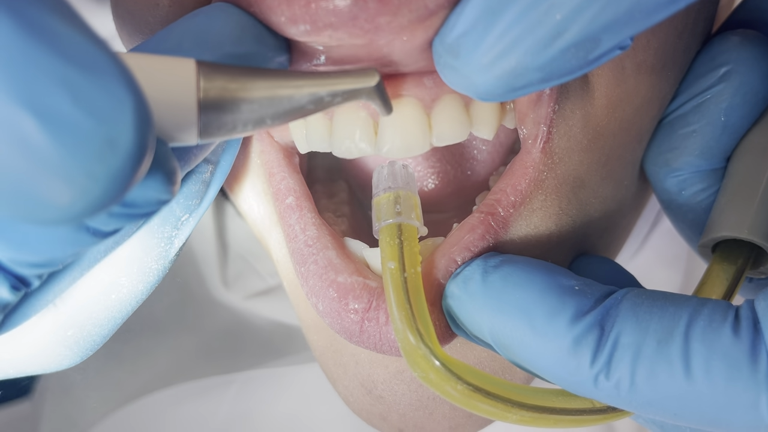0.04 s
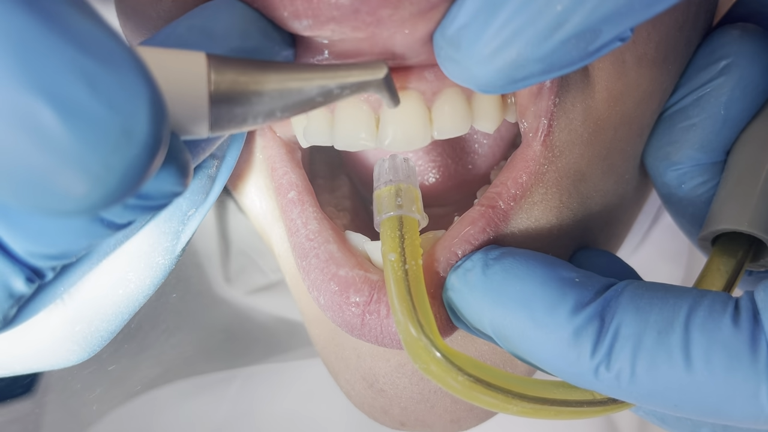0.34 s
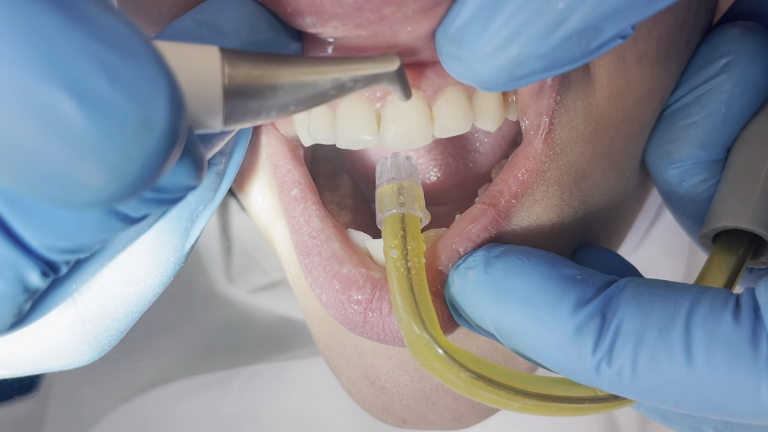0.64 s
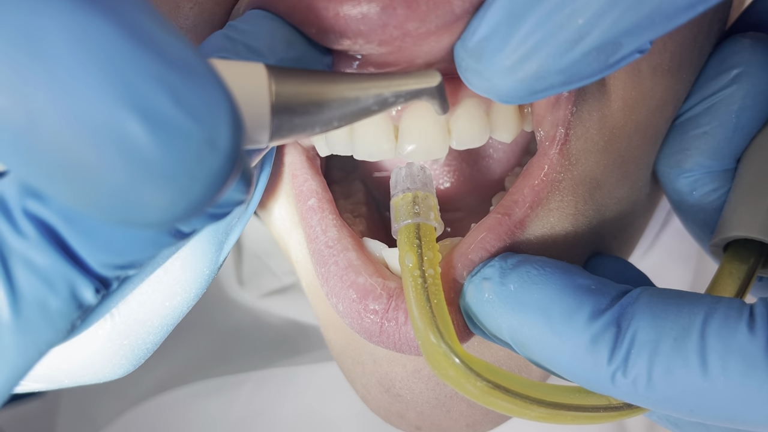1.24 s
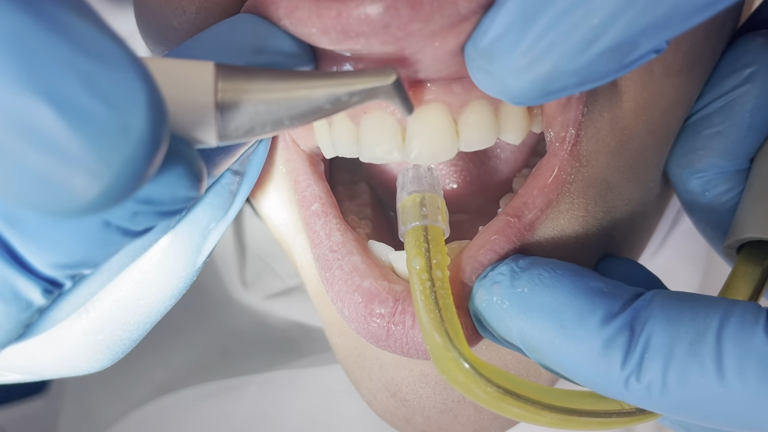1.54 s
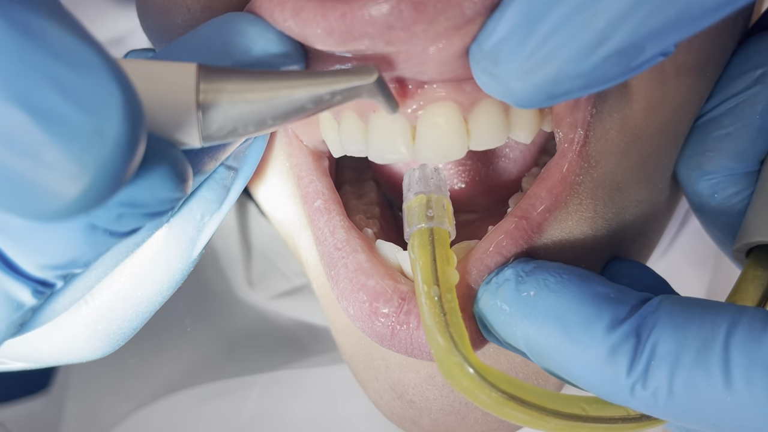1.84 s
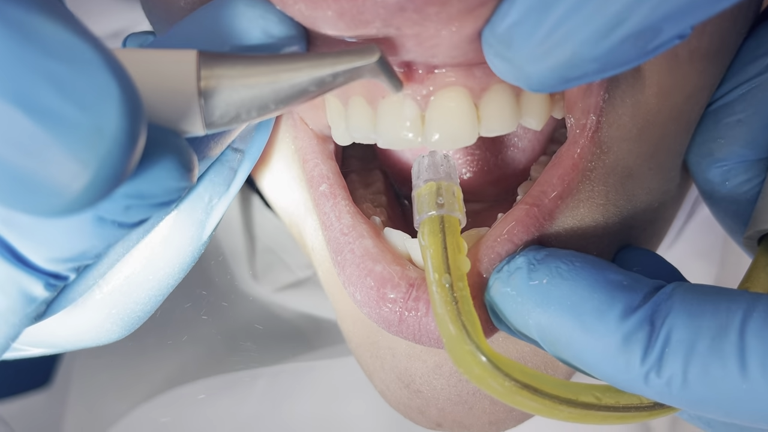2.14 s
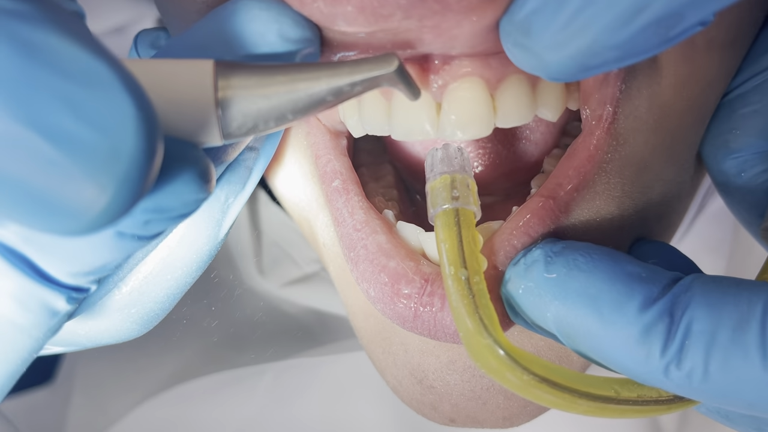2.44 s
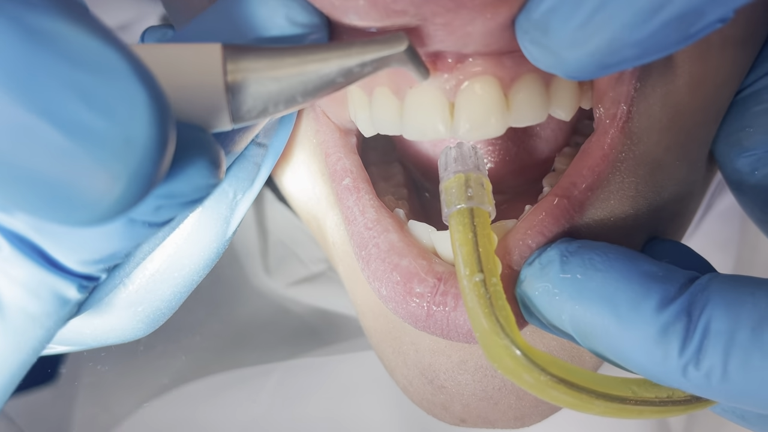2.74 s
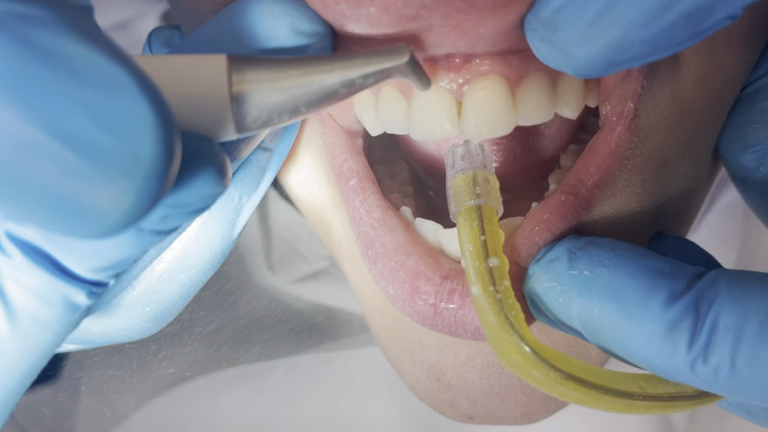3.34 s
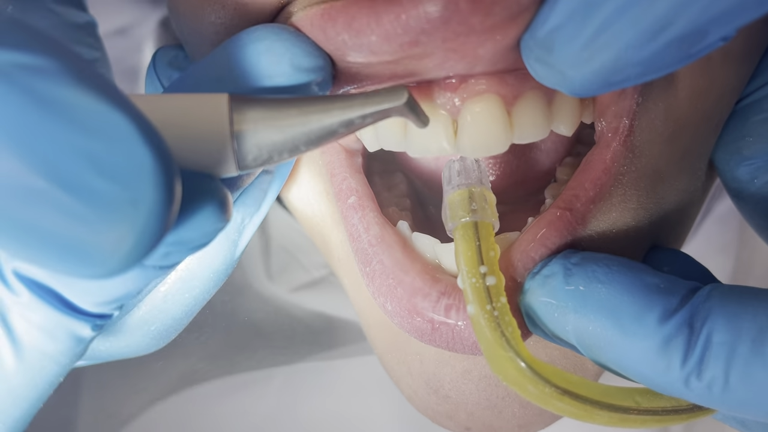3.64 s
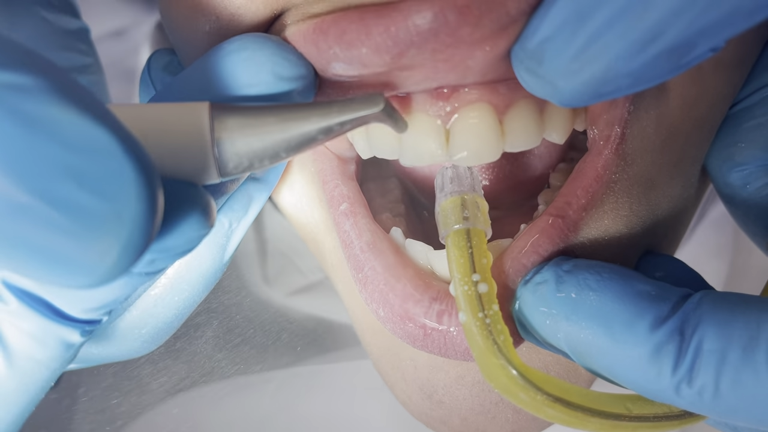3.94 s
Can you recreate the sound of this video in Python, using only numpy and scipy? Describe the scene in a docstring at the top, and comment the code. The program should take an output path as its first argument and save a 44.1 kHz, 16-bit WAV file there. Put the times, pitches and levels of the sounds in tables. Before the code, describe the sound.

Bright spray hiss from a dental polisher, pausing briefly, with gurgling suction and low pump hum.

```python
"""A small dental treatment room, a pair of microphones close to the open mouth.
An air polisher sprays the front teeth: the jet hisses, flares where it strikes enamel and rings
the mouth. It gives two wet squeals and dies down for half a second. A suction tube slurps
throughout and pops on slugs of water, most of all in the lull, over the low drone of its pump."""
import sys
import numpy as np
from scipy import signal
from scipy.fft import rfft, irfft
from scipy.io import wavfile

SR = 44100
rng = np.random.default_rng(int(sys.argv[2]) if len(sys.argv) > 2 else 0)


def put_to_file(sound):
    """Save the sound as 16-bit audio at rate SR, in the file named by the first command-line argument."""
    columns = np.atleast_2d(sound).T  # one column per channel
    safe = np.clip(columns, -1, 1)
    whole_steps = np.round(safe * 32767)
    wavfile.write(sys.argv[1], SR, whole_steps.astype(np.int16))


N = 176400


def amp(db):
    return 10 ** (np.asarray(db) / 20)


def unit_rms(x):
    return x / np.sqrt(np.mean(x ** 2) + 1e-20)


def curve(points):
    """Joins (time, value) points, sample by sample."""
    return np.interp(np.arange(N) / SR, *np.transpose(points))


def spectrum(points):
    """Joins (frequency, value) points, bin by bin, on a log frequency axis."""
    hz, value = np.transpose(points)
    return np.interp(np.log(np.fft.rfftfreq(N, 1 / SR) + 1), np.log(hz + 1), value)


def colour(x, points):
    """Filters x by (frequency, dB) points, to an rms of 1."""
    return unit_rms(irfft(rfft(x) * amp(spectrum(points)), N))


def add(mix, start_s, sound):
    part = mix[round(start_s * SR):][:len(sound)]
    part += sound[:len(part)]


def wander(hz):
    """Random drift, mostly slower than hz, at an rms of 1."""
    f = np.fft.rfftfreq(N, 1 / SR)
    return unit_rms(irfft(rfft(rng.standard_normal(N)) * (f > hz / 10) / (1 + (f / hz) ** 2), N))


def resonate(x, hz, width):
    """A steep resonance of gain 1 that follows hz."""
    carrier = np.exp(2j * np.pi * np.cumsum(hz * np.ones(len(x))) / SR)
    r = np.exp(-np.pi * width / SR)
    return 2 * (carrier * signal.lfilter([(1 - r) ** 2], [1, -2 * r, r * r], x * carrier.conj())).real


def wet_noise(clicks_per_s, spread_db, click_share):
    """Turbulence mixed with droplet clicks of uneven size."""
    clicks = (rng.random(N) < clicks_per_s / SR) * rng.choice([-1, 1], N)
    sizes = amp(spread_db * np.minimum(rng.exponential(1, N), 4))
    turbulence = rng.standard_normal(N)
    return np.sqrt(1 - click_share) * turbulence + np.sqrt(click_share) * unit_rms(clicks * sizes)


def air_jet():
    """Turbulent air hisses out of the nozzle."""
    # air flow through the nozzle (time [s], level [dB])
    flow = [(0, -31.5), (.8, -31.5), (1.25, -33), (1.68, -32.5), (1.82, -32.5), (1.95, -49), (2.25, -44),
            (2.4, -38), (2.53, -34.5), (2.9, -30.5), (3.4, -33), (4, -31.5)]
    # hiss of the free jet (frequency [Hz], relative level [dB])
    hiss = [(30, -39), (500, -25), (1200, -11.5), (2100, -8), (2600, -14.5), (3200, -10), (3700, -18),
            (4300, -5), (5600, -8.5), (8000, -8), (10500, 6), (13000, -21.5), (14200, -4), (15000, -8),
            (16000, -1)]
    return amp(curve(flow)) * colour(rng.standard_normal(N), hiss)


def enamel(spray, position):
    """Spray strikes enamel with a bright hiss that changes colour from tooth to tooth."""
    # spray striking the teeth (time [s], relative level [dB])
    impact = [(0, -22.5), (.03, -23), (.1, -26), (.25, -27.5), (.4, -31), (.46, -22.5), (.54, -23),
              (.58, -28), (.75, -26), (.8, -30), (.965, -31.5), (.995, -25), (1.04, -21.5), (1.12, -20),
              (1.16, -24.5), (1.42, -27.5), (1.68, -31.5), (1.83, -40), (1.94, -47), (2.22, -53.5),
              (2.37, -43), (2.53, -27), (2.63, -23), (2.7, -26), (2.94, -25), (3.03, -22), (3.15, -21),
              (3.23, -26.5), (3.42, -28.5), (3.53, -22.5), (3.67, -22), (3.72, -28), (4, -28)]
    # points along the spectrum of that hiss (frequency [Hz])
    hiss_hz = [2000, 5000, 7000, 8000, 8600, 9100, 9400, 9900, 10500, 11250, 11700, 12100, 12600, 13200,
               14200, 15500]
    # hiss on the first teeth at those points (relative level [dB])
    first_db = [-36, -43, -16, -14.5, -13.5, -6.5, -12, -0.5, -3.5, 0, -8, -3, -23, -12, -20, -19]
    # hiss on the next teeth at those points (relative level [dB])
    next_db = [-43, -31, -22.5, -12.5, -5.5, -7.5, -5.5, -5.5, -1.5, 1, 0.5, -11.5, -6, -18.5, -19, -38]
    on_first, on_next = (colour(spray, list(zip(hiss_hz, db))) for db in (first_db, next_db))
    return amp(3 + curve(impact)) * ((1 - position) * on_first + position * on_next)


def mouth(spray, position):
    """Spray rings the mouth, whose resonances rise a little as the nozzle moves on."""
    # resonances of the open mouth (frequency [Hz], width [Hz], gain at first teeth [dB], at next [dB])
    resonances = [(3200, 380, -18, -18.5), (4224, 454, -4, -8), (5310, 390, -2.5, 0.5), (6213, 520, 2, 2.5),
                  (7384, 660, 2, 3.5), (9030, 1500, -10.5, -7)]
    # spray ringing the mouth (time [s], relative level [dB])
    ringing = [(0, -32), (.04, -30.5), (.16, -39.5), (.37, -40), (.46, -30), (.62, -30), (.72, -38.5),
               (.93, -39.5), (1.02, -29), (1.1, -27), (1.2, -34.5), (1.6, -35), (1.68, -30.5), (1.78, -37),
               (1.93, -56), (2.3, -52.5), (2.39, -43), (2.415, -36), (2.6, -27), (2.66, -28), (2.74, -38),
               (2.9, -36), (3.02, -31), (3.17, -32.5), (3.37, -42), (3.52, -32.5), (3.68, -32.5),
               (3.8, -38.5), (4, -41.5)]
    pitch = 1 + 0.023 * position
    ring = sum(amp(first_db + (next_db - first_db) * position) * resonate(spray, hz * pitch, width)
               for hz, width, first_db, next_db in resonances)
    return amp(0.5 + curve(ringing)) * unit_rms(ring)


def polisher():
    """Free jet, spray on enamel and ringing mouth, all sputtering together."""
    # the nozzle's travel from the first teeth to the next (time [s], position [0-1])
    travel = [(0, 0), (1.1, 0.14), (1.9, 0.7), (2.55, 1), (3.1, 0.66), (3.6, 1), (4, 0.7)]
    position = np.clip(curve(travel), 0, 1)
    air = air_jet()
    on_teeth, in_mouth = (wet_noise(clicks_per_s=2500, spread_db=1.5, click_share=0.26) for _ in range(2))
    sputter = np.exp(0.081 * wander(hz=84.5))
    return (air + enamel(on_teeth, position) + mouth(in_mouth, position)) * sputter


def suction():
    """Air and small bubbles rush through the tube's resonance."""
    # strength of the slurping (time [s], level [dB])
    slurp = [(0, -45), (.45, -43.5), (.97, -45.5), (1.01, -39), (1.07, -37.5), (1.14, -48), (1.42, -43.5),
             (1.8, -47.5), (1.95, -47.5), (2.28, -48), (2.45, -45.5), (2.53, -44.5), (2.7, -45), (3.3, -46),
             (4, -48)]
    # response of the suction tube (frequency [Hz], relative level [dB])
    tube = [(30, -43), (150, -10), (300, -11), (450, -9), (700, -15.5), (1000, -8), (1200, -2), (1380, 7.5),
            (1520, 0.5), (1750, -11.5), (2100, -35.5), (2700, -14), (3250, -8), (3600, -8), (6300, -16),
            (7000, -24), (9000, -12), (13000, -36), (16000, -36)]
    bubbly_air = wet_noise(clicks_per_s=260, spread_db=2.5, click_share=0.54)
    return amp(curve(slurp)) * colour(bubbly_air, tube)


def pump():
    """The suction pump rumbles and hums, its bass nearly alike on both microphones."""
    # pump tones and a thin suction whistle (frequency [Hz], level [dB], waver [share of the pitch])
    partials = [(132.7, -54.5, 0.018), (193.5, -60.5, 0.0094), (325.5, -68, 0.01), (6460, -59.5, 0.0019)]
    # pump drone (frequency [Hz], relative level [dB])
    drone = [(22, -48), (31, -34), (42, -10.5), (52, 0.5), (80, 0.5), (100, 2), (135, 2.5), (165, -0.5),
             (200, -9.5), (250, -13), (400, -19), (900, -22), (4000, -70)]
    # the part of the drone that differs between the microphones (frequency [Hz], relative level [dB])
    spread = [(40, -22), (100, -12.5), (180, -8), (300, 2.5)]
    t = np.arange(N) / SR
    drift = np.cumsum(wander(hz=8)) / SR
    tones = sum(amp(db) * np.sqrt(2) * np.sin(2 * np.pi * hz * (t + waver * drift))
                for hz, db, waver in partials)
    mid, side = (colour(rng.standard_normal(N), drone) for _ in range(2))
    side = irfft(rfft(side) * amp(spectrum(spread) - 4.5), N)
    return amp(-46) * np.array([mid + side, mid - side]) + tones


def plop(t, pitch):
    """The dull ring of water in the tube, which passes no treble."""
    # modes of the tube (frequency at a pitch of 1 [Hz], relative level [dB], time to fall 60 dB [s])
    modes = [(400, -22, 0.0057), (626, -13, 0.0069), (850, -8, 0.0072), (1100, -6.5, 0.012),
             (1322, -3.5, 0.026)]
    ring = sum(amp(db - 60 * t / t60) * np.sin(2 * np.pi * hz * pitch * t) for hz, db, t60 in modes)
    return signal.sosfilt(signal.butter(6, 1750, "lowpass", fs=SR, output="sos"), ring)


def pops(grain_db=-10, grain_decay_s=0.0013):
    """Each slug of water rings the tube, and its film bursts with a snap."""
    # slugs of water in the tube (time [s], relative level [dB], relative level of the snap [dB])
    slugs = [(1.231, -22.5, -8), (1.402, -30.5, -6), (1.884, -28, 2), (1.942, -27.5, 1.5),
             (1.998, -30.5, -12), (2.03, -22, -4.5), (2.0425, -29, -19), (2.05, -39.5, 9.5),
             (2.070, -29, -16), (2.0738, -25, -4), (2.095, -34, -17), (2.143, -24.5, -4.5),
             (2.185, -30, -0.5), (2.216, -28.5, -5.5), (2.24, -29, -6), (2.25, -28, -3), (2.301, -28.5, -8),
             (2.323, -28, -2), (2.373, -27.5, -8), (2.52, -27, -12), (2.53, -31, -12)]
    # resonances of a bursting film (frequency [Hz], width [Hz], relative level [dB])
    film = [(3850, 710, 1), (5300, 430, -1.5), (6240, 700, 1.5), (7620, 660, 0.5), (9800, 4200, -1)]
    out, t = np.zeros(N), np.arange(SR // 20) / SR
    for start, db, snap_db in slugs:
        burst = (t == 0) + amp(grain_db) * rng.standard_normal(len(t)) * np.exp(-t / grain_decay_s)
        snap = sum(amp(band_db) * resonate(burst, hz, width) for hz, width, band_db in film)
        snap *= amp(4.5 + snap_db) / abs(snap).max()
        ring = plop(t, pitch=1 + 0.053 * rng.standard_normal())
        add(out, start, amp(db - 1.5) * (ring + snap))
    return out


def squeals(width_hz=630, fade_s=0.011):
    """The jet catches in a gap and gives short, fuzzy, falling whistles."""
    # wet squeals (time [s], length [s], level [dB], start pitch [Hz], end pitch [Hz])
    glides = [(1.642, 0.048, -26.5, 5440, 5300), (1.809, 0.069, -32, 6180, 5730)]
    out = np.zeros(N)
    for start, length, db, from_hz, to_hz in glides:
        progress = np.linspace(0, 1, round(length * SR))
        hz = from_hz + (to_hz - from_hz) * progress
        whistle = resonate(rng.standard_normal(SR)[:len(hz)], hz, width_hz)
        fade = np.minimum(np.minimum(progress, 1 - progress) * length / fade_s, 1)
        add(out, start, amp(db) * unit_rms(whistle) * fade)
    return out


def gurgle(count=40, from_s=1.85, to_s=2.38):
    """Small bubbles crowd the tube while the jet rests."""
    out, t = np.zeros(N), np.arange(SR // 20) / SR
    starts = rng.uniform(from_s, to_s, count)
    for start, offset_db, detune in zip(starts, *rng.standard_normal((2, count))):
        add(out, start, amp(-38 + offset_db) * plop(t, pitch=0.92 + 0.094 * detune))
    return out


def reflections(x, delay_s=0.004):
    """Diffuse sound off the near walls: a little later, its phases scrambled."""
    frames = signal.stft(x, nperseg=384)[2]
    smear = signal.istft(frames * np.exp(2j * np.pi * rng.random(frames.shape)))[1][:N]
    return np.std(x) * unit_rms(np.roll(smear, round(delay_s * SR)))


def scene():
    """The mouth reaches the close pair directly and by way of the room; the pump lies underneath."""
    # phase between the microphones (frequency [Hz], lead of the left [rad])
    phase_lead = [(20, 0), (1300, .25), (1700, 0), (4500, .1), (6400, .6), (7500, 1.1), (8050, .7),
                  (8400, .1), (8850, -.2), (9200, -1.25), (10250, -3.14), (11000, -4.55), (11800, -6.05),
                  (12350, -6.5), (12900, -7.7), (13300, -9), (14250, -9.8), (14650, -11.2), (15200, -12.45)]
    # balance of the microphones (frequency [Hz], left minus right [dB])
    balance_db = [(200, 1.5), (750, 4), (1050, 3), (1500, 9.5), (1780, 8), (2050, 10.5), (2500, 6.5),
                  (3300, 2.5), (3700, 0.5), (6100, -.5), (7100, 3.5), (8300, 0), (16000, 0)]
    # room reflections (frequency [Hz], level against the direct sound [dB])
    room_db = [(100, -24), (400, -0.5), (800, -7.5), (1400, -6.5), (2300, -4), (3200, -2), (4200, -23),
               (5700, -4.5), (6300, -8), (6900, 9), (7500, -12), (8600, -15.5), (12000, -29), (12900, -18),
               (13700, -15), (14600, -8), (15400, -15)]
    near = polisher() + squeals() + suction() + pops() + gurgle()
    sides = np.array([[1], [-1]])  # left, right
    direct = rfft(near) * np.exp(0.5j * sides * spectrum(phase_lead))
    wet = amp(spectrum(room_db))
    room = wet * rfft(np.array([reflections(near), reflections(near)]))
    balance = amp(0.5 * sides * spectrum(balance_db))
    balance /= np.sqrt(np.mean(balance ** 2, axis=0))  # keeps the total power
    return irfft(balance * (direct + room) / np.sqrt(1 + wet ** 2), N) + pump()


def record(dry):
    """The recorder's band limit cuts the highest treble."""
    edge_hz = 15760
    lowpass = signal.firwin(1023, edge_hz, window=("kaiser", 9), fs=SR)
    return signal.oaconvolve(dry, lowpass[None], "same")


dry = scene()
out = record(dry)
put_to_file(out)
```